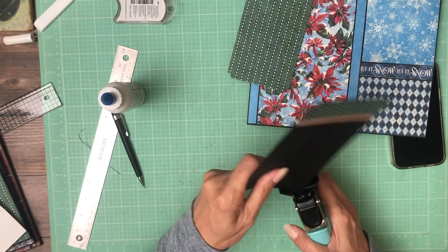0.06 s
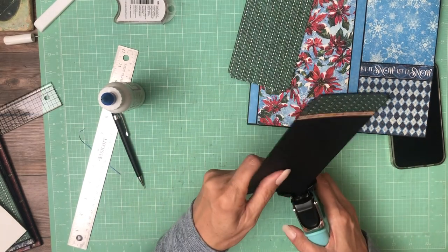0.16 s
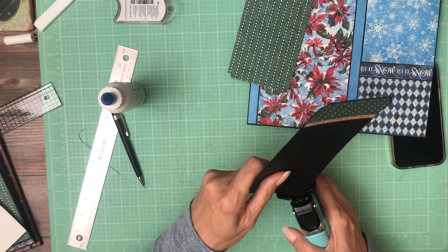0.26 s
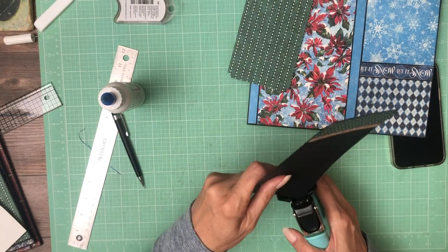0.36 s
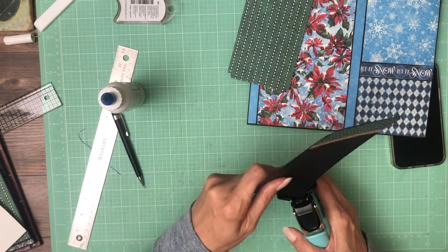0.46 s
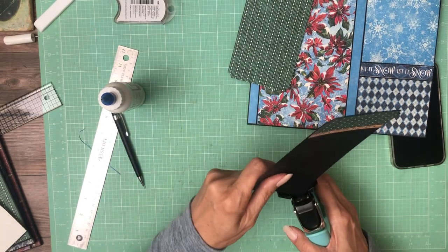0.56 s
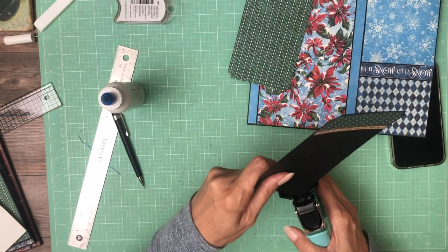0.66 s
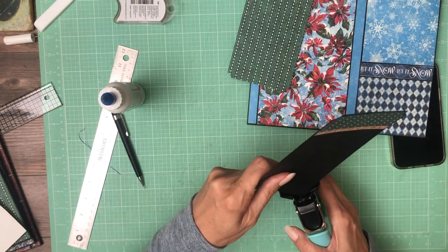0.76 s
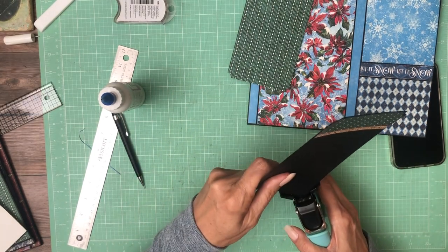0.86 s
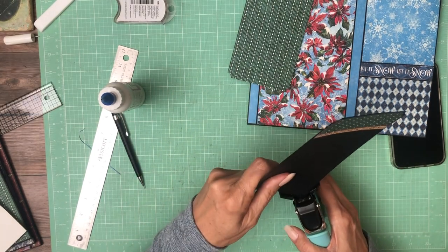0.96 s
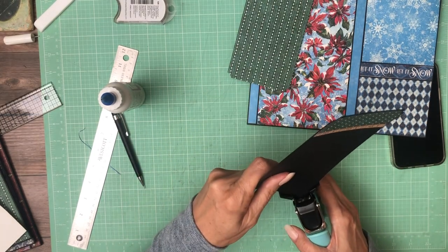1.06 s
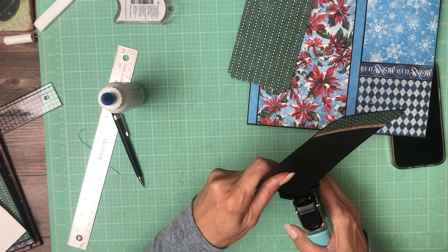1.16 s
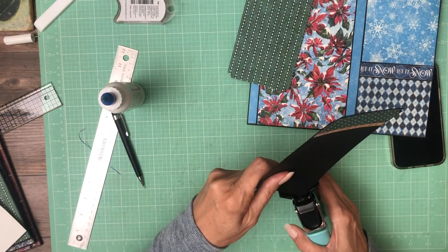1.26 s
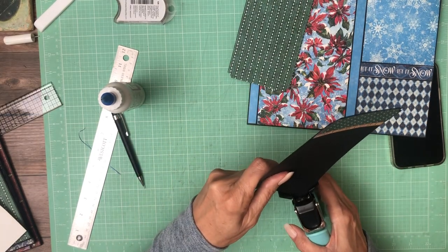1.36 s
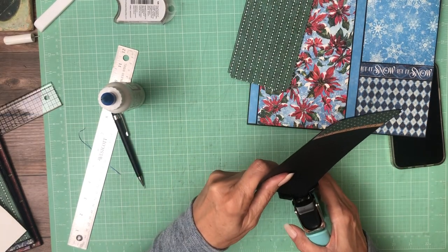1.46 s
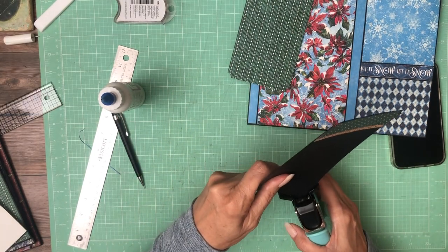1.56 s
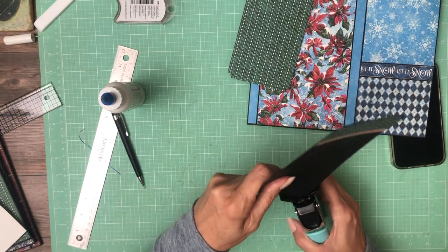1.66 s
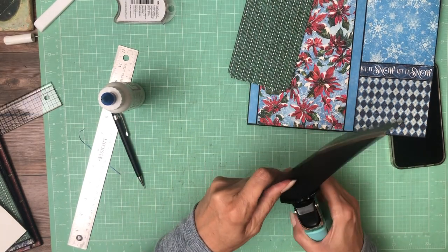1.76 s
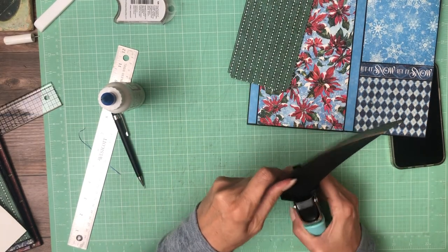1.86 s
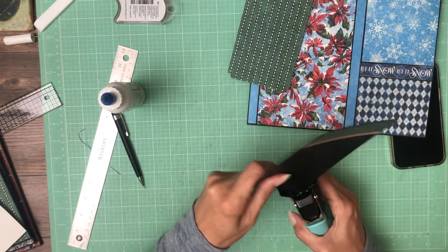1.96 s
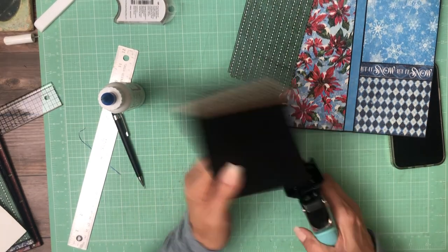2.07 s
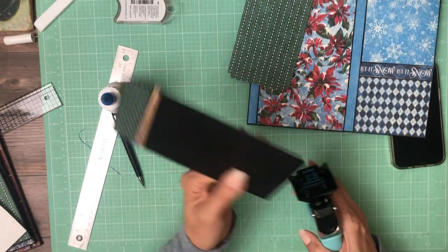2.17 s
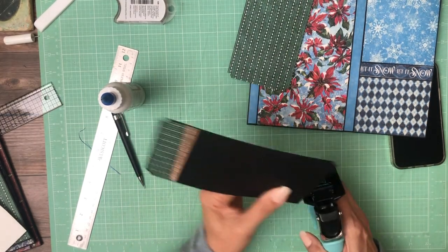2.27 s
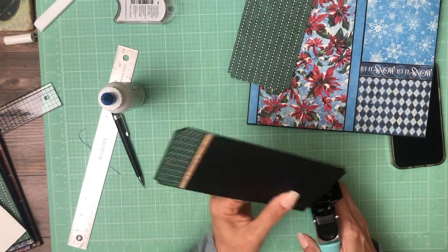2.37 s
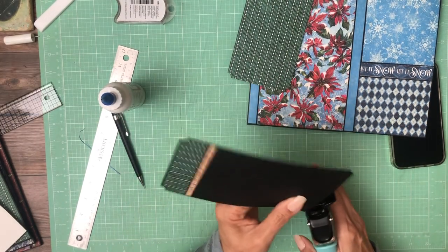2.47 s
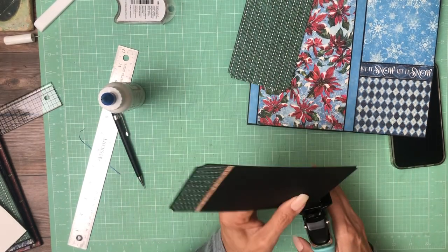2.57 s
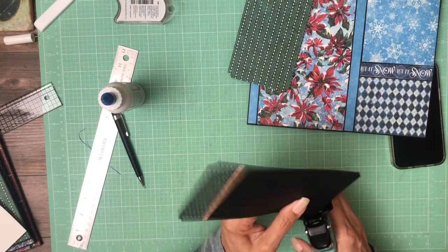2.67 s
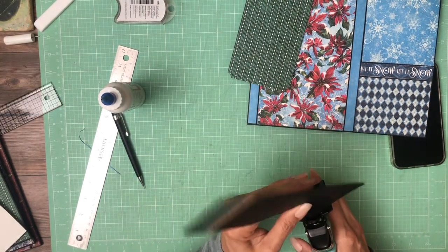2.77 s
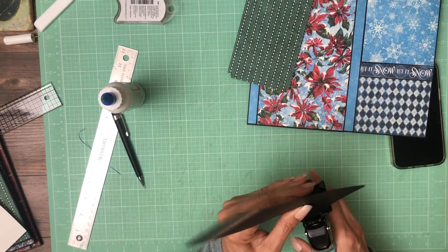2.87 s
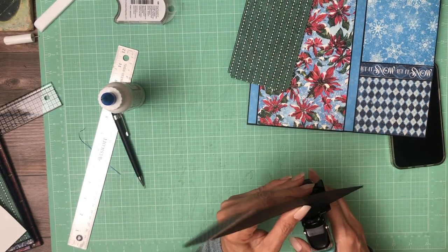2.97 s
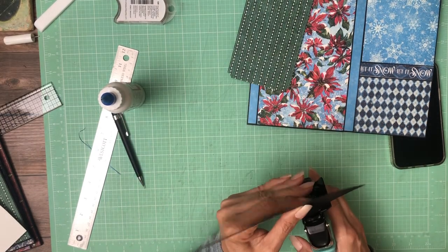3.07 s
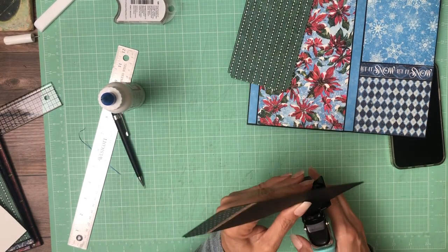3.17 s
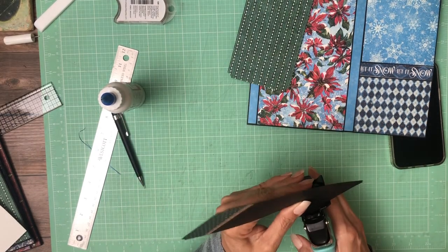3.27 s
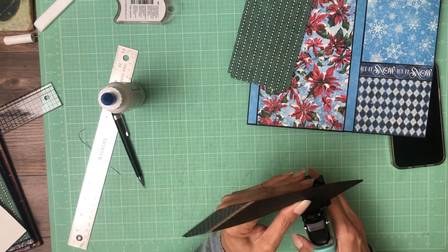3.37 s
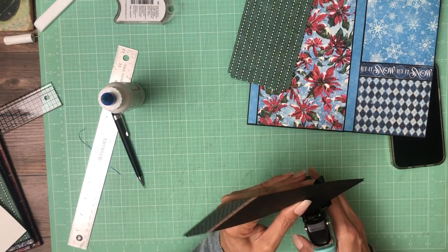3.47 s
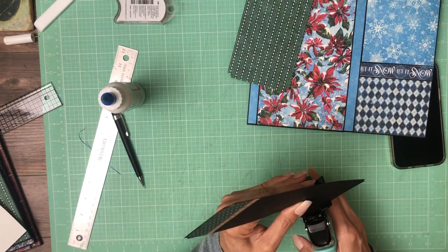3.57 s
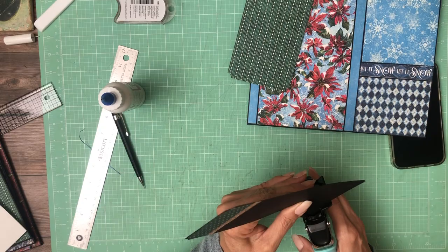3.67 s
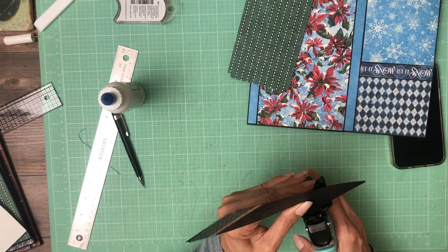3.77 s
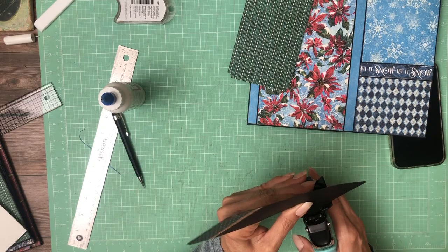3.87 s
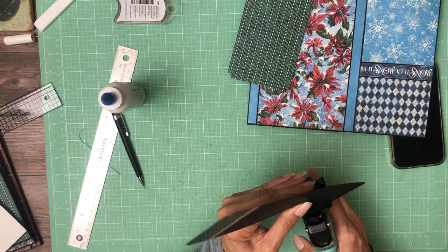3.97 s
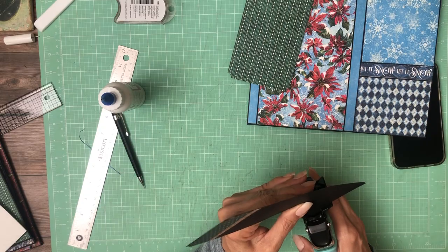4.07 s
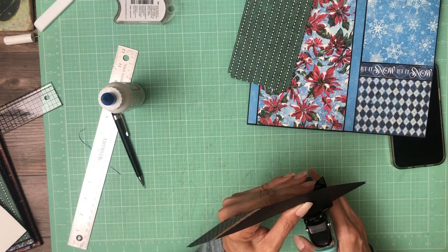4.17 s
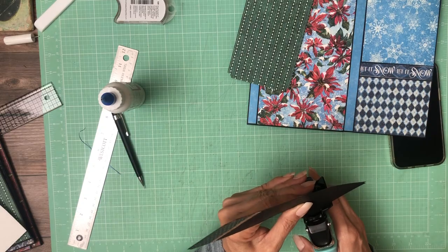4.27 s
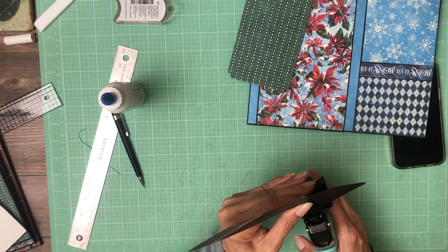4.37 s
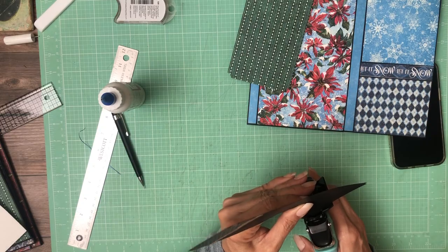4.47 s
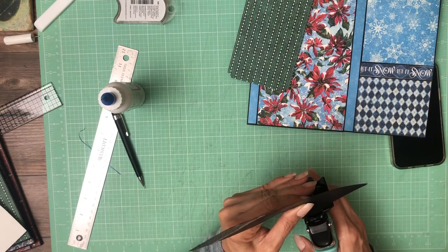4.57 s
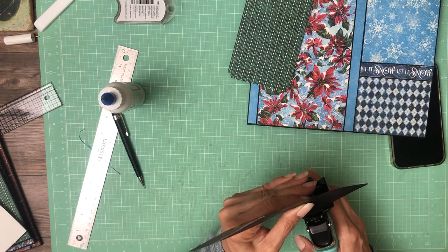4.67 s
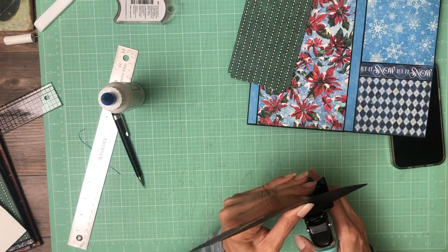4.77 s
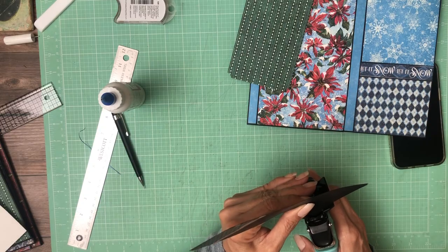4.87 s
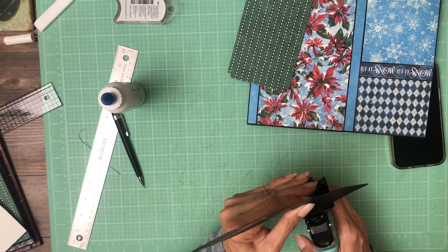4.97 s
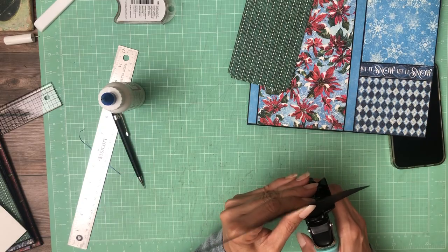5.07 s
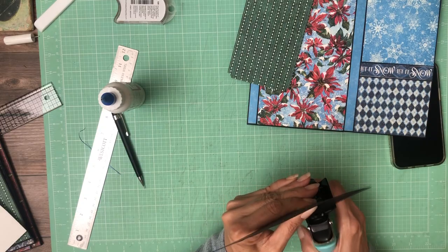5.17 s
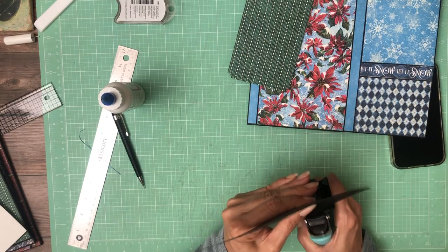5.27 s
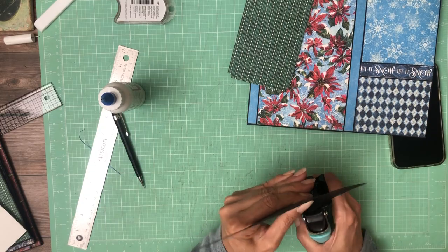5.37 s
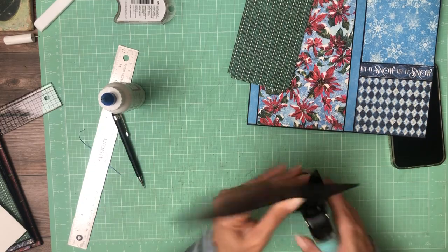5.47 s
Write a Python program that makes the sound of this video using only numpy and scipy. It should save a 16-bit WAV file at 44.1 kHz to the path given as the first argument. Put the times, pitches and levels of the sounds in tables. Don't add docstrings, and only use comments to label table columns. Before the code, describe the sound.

A small, quiet room heard through a close phone microphone, mono and dry with a short dull tail. From 0 to 0.7 s stiff card scrapes softly into a steel punch jaw, with small ticks and nudges. Near silence follows until 1.7 s, when the jaw closes with a gritty rub, nips at 1.77 and shears through at about 1.83 with a bright, fibrous crunch. From 1.96 to 2.09 the lever opens in a rattling run of metallic clacks with low thuds. The sheet then swishes and flaps at 2.1-2.3, knocks hollowly at 2.4, and ticks brightly at 2.66-2.76. Very faint brushes and ticks continue, with a small finger slide at 3.23 and a tick at 3.46. After about 4 s there is mostly room tone and a faint low motor hum. At 5.15 the jaw closes again, crunches at 5.24-5.3, and releases with the loudest hard snaps at 5.44-5.47 and a low thud.

```python
import sys
import numpy as np
from scipy import signal
from scipy.fft import rfft, irfft
from scipy.io import wavfile
from scipy.ndimage import uniform_filter1d

SR = 44100
rng = np.random.default_rng(int(sys.argv[2]) if len(sys.argv) > 2 else 0)


def unload_audio(sound):
    columns = np.transpose(np.atleast_2d(sound))
    steps = np.round(np.clip(columns, -1, 1) * 32767)
    wavfile.write(sys.argv[1], SR, steps.astype(np.int16))


def gain_from_decibels(decibels):
    exponent = np.asarray(decibels, float) / 20
    return 10 ** exponent


N = 243431


def unit(x):
    return x / np.sqrt(np.mean(x ** 2) + 1e-30)


def even(x, weight):
    return x * np.sqrt(np.sum(weight ** 2) / np.sum((x * weight) ** 2))


def peak(x, db):
    return x * gain_from_decibels(db) / np.max(np.abs(x))


def add(out, x, start_s):
    i = int(start_s * SR)
    out[i:i + len(x)] += x[:max(len(out) - i, 0)]


def band(x, lo_hz, hi_hz, order=3):
    return signal.sosfilt(signal.butter(order, [lo_hz, hi_hz], "band", fs=SR, output="sos"), x)


def walk(count, rate_hz):
    hold = max(int(SR / rate_hz), 2)
    levels = np.repeat(rng.standard_normal(count // hold + 1), hold)
    return unit(uniform_filter1d(levels, hold)[:count])


def struck(t, modes, t60_s, rise_s):
    push = (1 - np.exp(-t / rise_s)) ** 2
    decay = np.exp(-np.log(1000) * t / max(t60_s, .005))
    return push * decay * sum(gain_from_decibels(db) * np.cos(2 * np.pi * hz * t) for hz, db in modes)


def pressure(t, rise_s, fall_s, steep, roundness):
    build = np.clip(t / rise_s, 0, 1) ** steep
    return build * gain_from_decibels(-20 * (np.maximum(t - rise_s, 0) / fall_s) ** roundness)


def ring(x, modes, sway_db):
    out = 0
    for k, (hz, width_hz, db) in enumerate(modes):
        shifted_hz = hz * (1 + 0.021 * rng.standard_normal())
        gain = (-1) ** k * gain_from_decibels(db + sway_db * walk(len(x), 45))
        b, a = signal.iirpeak(shifted_hz, shifted_hz / width_hz, fs=SR)
        out = out + gain * signal.lfilter(b, a, x)
    return out


def rub(count, body, lo_hz, hi_hz):
    steel = {"jaw": [(260, 82, 6.5), (508, 67, 14), (1730, 160, 11), (2800, 50, 7), (3660, 760, 18),
             (4820, 550, 12), (5180, 350, 10.5), (6060, 200, 11), (7440, 190, -9), (9200, 250, 11)],
             "blade": [(350, 46, 5), (514, 100, 12), (1049, 52, 7), (1303, 130, 10.5), (1605, 220, 10.5),
             (2020, 340, 10.5), (2680, 480, 17), (3060, 1100, 11), (5336, 19000, -9.5), (6220, 390, 6),
             (9300, 500, 3), (12700, 900, 4.5)], "bite": [(260, 80, 5.5), (516, 290, 9.5), (1580, 220.3, 9),
             (2620, 470, 18), (3220, 500, 7), (4292, 900, 9.5), (5600, 250, 2.5), (9150, 400, 6),
             (12000, 700, 6), (14630, 610, 7)], "guide": [(450, 85, -1), (1710, 130, -5), (2330, 68, 9),
             (3400, 920, 20), (4000, 190, 9), (5100, 160, 11), (6200, 210, 9)], "edge": [(1260, 80, 9),
             (1400, 140, 6), (1917, 250, 6.5), (2620, 300, 18.5), (4000, 1700, 5.5), (6200, 560, 0)]}
    card = {"flap": [(319, 210, 32), (1560, 120, 13), (2264, 590, 10), (3205, 380, 12), (4800, 980, 8),
            (8170, 1200, 13), (10600, 400, 14), (14300, 1200, 5)], "sheet": [(420, 140, 37),
            (1650, 230, 5.5), (3940, 780, 3.5), (5130, 120, 13), (5850, 400, -1.5), (7000, 610, 9),
            (8550, 2000, 5.5), (11900, 500, 2), (14500, 780, -0.5)], "rim": [(430, 160, 2), (1630, 76, 3),
            (3150, 120, 3.5), (3900, 240, 6), (5180, 170, 21.5), (7150, 120, 11), (8400, 270, -4),
            (12000, 300, 2), (14800, 910, 7)], "finger": [(282, 96, 7.5), (1590, 350, 20.5),
            (2600, 1300, 22), (4000, 300, 9), (5100, 230, 12), (6730, 310, 15), (8160, 500, 24),
            (9100, 600, 25)]}
    grain = {"bite": (320, 2.7, .2, 2, 20000), "rim": (205, 6.2, 0.21, 8.1, 20000),
             "jaw": (203, 2.3, 0.24, 3.8, 20000), "blade": (330, 1.4, 0.13, 2.9, 23000),
             "edge": (590, 1.6, 0.091, 3.7, 20000), "guide": (340, 2.2, 0.21, 2.2, 20000),
             "sheet": (160, 0.73, 0.068, 4.7, 20000), "flap": (270, 2.9, 0.08, 5.4, 20000),
             "finger": (670, 1.5, 0.21, 1.2, 6800)}
    rate_hz, scatter_db, crack_share, sway_db, top_hz = grain[body]
    noise = rng.standard_normal(count)
    crack_db = 10 * np.minimum(rng.exponential(size=count), 2.8)
    cracks = unit((rng.random(count) < .03) * np.sign(noise) * gain_from_decibels(crack_db))
    force = noise
    if lo_hz > 500:
        force = force + crack_share * 2 * cracks
    if lo_hz < 500:
        scatter_db = scatter_db * .4
    force = force * gain_from_decibels(scatter_db * walk(count, rate_hz))
    direct = band(force, 100, top_hz, order=2) if top_hz < hi_hz else force
    modes = [mode for mode in {**steel, **card}[body] if lo_hz <= mode[0] < hi_hz]
    return band(direct + ring(force, modes, sway_db), lo_hz, hi_hz)


def rub_strokes(out, rows, body, boom_db, hiss_db, steep, roundness, hiss_pace):
    # low f/Hz, high f/Hz
    bands_hz = [(900, 3200), (190, 800), (3200, 7000), (7000, 16500)]
    stroke_s, boom_lag_s = .21, 0.017
    t = np.arange(int(stroke_s * SR)) / SR
    fade = np.clip((stroke_s - t) / .03, 0, 1)
    for start_s, rise_s, db, fall_s, ring_db in rows:
        def shape(lag_s, pace):
            return pressure(t - lag_s, max(rise_s, .001), max(fall_s, .005) / pace, steep, roundness)

        grains = []
        for lo_hz, hi_hz in bands_hz:
            weight = shape(boom_lag_s * (lo_hz < 500), 1)
            grains.append(even(rub(len(t), body, lo_hz, hi_hz), weight))
        mid, boom, scrape, hiss = grains
        top = band(hiss, 13000, 19000, order=1)
        sound = (mid * gain_from_decibels(ring_db) + scrape) * shape(0, 0.94)
        sound += boom * gain_from_decibels(boom_db) * shape(boom_lag_s, 1)
        sound += gain_from_decibels(hiss_db) * ((hiss - top) * shape(0, hiss_pace) + top * shape(0, hiss_pace * 1.3))
        add(out, sound * gain_from_decibels(db) * fade, start_s)


def shear():
    # start t/s, rise/s, scrape level/dB, 20 dB fall/s, body ring relative level/dB
    closings = [(1.7, 0.009, -60, 0.056, 3), (1.726, 0.015, -44, 0.21, 2.5),
                (1.74, 0.025, -42.5, 0.042, 7.5), (5.145, 0.021, -70.5, 0.059, 5.5),
                (5.178, 0.024, -48, 0.03, -8.5), (5.203, 0.0046, -40, 0.08, -1),
                (5.215, 0.015, -38, 0.041, 6), (5.418, 0.0049, -42, 0.018, 13)]
    nips = [(1.772, 0.0043, -33, 0.07, -3), (1.78, 0.0052, -35, 0.1, 6), (5.236, 0.003, -28.5, 0.06, -2),
            (5.244, 0.0027, -37.5, 0, 4.5), (2.72, 0.0075, -42, -0.13, 0), (2.758, .005, -50, -0.07, -9),
            (2.2, .006, -45, 0.23, -6)]
    cuts = [
        (1.82, 0.012, -25.5, 0.056, 0.89),
        (1.83, 0.02303, -23.5, 0.091, 2.7),
        (5.269, 0.0014, -30.5, 0.012, 2),
        (5.274, 0.0066, -23, 0.073, 1.9),
        (5.285, 0.021, -25, 0.069, 3.8),
    ]
    drags = [
        (1.9, 0.018, -39.5, 0.07, 4.01),
        (5.335, 0.015, -35.5, 0.15, 3.7),
    ]
    openings = [(1.958, 0.0053, -42.5, 0.017, 8), (1.972, 0.0023, -35, 0.041, 0.5),
                (2.007, 0.0034, -29, 0.0094, -5), (2.016, 0.0034, -34.5, .012, 7.5),
                (2.027, 0.0026, -31.5, 0.032, -0.5), (2.035, 0.017, -38.5, .12, 0),
                (2.06, 0.013, -39.5, 0.055, 2), (5.44, 0.0017, -49.5, 0.073, 4),
                (5.4685, 0.0016, -23, 0.008, 3), (5.478, 0.0074, -33.5, 0.084, 6)]
    out = np.zeros(N)
    rub_strokes(out, closings, "bite", -22, -9.5, steep=1.594, roundness=0.9, hiss_pace=0.81)
    rub_strokes(out, nips, "bite", -22, -2.5, steep=0.47, roundness=0.88, hiss_pace=1.1)
    rub_strokes(out, cuts, "blade", -11.5, -1.55, steep=0.6, roundness=1.06, hiss_pace=1.4)
    rub_strokes(out, drags, "edge", -19, -2.5, steep=0.93, roundness=0.98, hiss_pace=2.2)
    rub_strokes(out, openings, "blade", -6, -2, steep=0.83, roundness=1.39, hiss_pace=1.2)
    return out


def snaps():
    # t/s, peak level/dB, ring f/Hz, second ring relative level/dB, t60/s
    snap_rows = [(1.7747, -23.5, 2600, -26, 0.042), (1.963, -14.5, 2600, -6.5, 0.02),
                 (1.9773, -28.5, 1956, -4, 0.06), (2.0089, -18, 2720, -12, 0.0074),
                 (2.0183, -23, 2800, 4, 0.024), (2.0308, -18, 2590, -15, 0.021),
                 (2.064, -22, 2600, -26, 0.038), (2.0872, -20.5, 2694, -14, 0.026),
                 (5.2408, -11.5, 2640, -7, 0.021), (5.271, -13, 2680, -20, 0.014),
                 (5.2765, -7.5, 2515, -17, 0.022), (1.8262, -12, 2690, -20, 0.018),
                 (2.0536, -20.5, 2680, -21, 0.026), (5.4356, -3.5, 2600, -2, 0.014),
                 (5.4642, -6, 2360, -5, 0.025), (5.4689, -6, 2640, 11.5, 0.0065)]
    second_hz, rise_s = 1512, 0.0013
    out, t = np.zeros(N), np.arange(int(.08 * SR)) / SR
    for start_s, db, hz, low_db, t60_s in snap_rows:
        modes = [(hz, 0), (1.09 * hz, -9), (second_hz, low_db), (1.2 * second_hz, low_db - 6.5)]
        steel = band(struck(t, modes, t60_s, 0.95 * rise_s), 1150, 9000, order=2)
        crack = band(rng.standard_normal(len(t)), 1600, 7500, order=2)
        crack *= struck(t, [(0.0035, 0)], 0.62 * t60_s, .7 * rise_s)
        add(out, gain_from_decibels(db + 1.5) * steel + peak(crack, -11.5 + .55 * db), start_s - .0003)
    return out


def feed():
    # start t/s, rise/s, scrape level/dB, 20 dB fall/s, body ring relative level/dB
    feeds = [(0, 0.002, -64, 0.02, 1.5), (.579, 0.006, -67, 0.045, 1.5), (.342, 0.003, -57, 0.04, 2.5),
             (.041, 0.062, -51, 0.045, -2), (.101, 0.032, -47.5, 0.06, -6), (.216, .004, -51.5, .035, -4.5),
             (.2575, 0.003, -51, .02, -1.5), (.2745, 0.0035, -50.5, .022, 2.5), (.283, 0.015, -47, .055, 4)]
    nudges = [
        (.432, 0.0017, -53, 0.057, -5),
        (.684, 0.012, -59, 0.026, 2.5),
    ]
    out = np.zeros(N)
    rub_strokes(out, feeds, "jaw", -2, -19, steep=0.99, roundness=1.28, hiss_pace=0.92)
    rub_strokes(out, nudges, "guide", -2.5, -18, steep=0.59, roundness=0.86, hiss_pace=1.2)
    return out


def card_ticks():
    # t/s, peak level/dB, lower f/Hz, upper f/Hz, upper relative level/dB
    feed_ticks = [(0.1315, -32, 1800, 3750, -30), (0.2196, -47, 3400, 6100, -1),
                  (0.2603, -38, 1900, 3600, 3), (0.2761, -28, 1745, 3400, -4.5),
                  (0.294, -30, 1860, 3600, -23), (0.345, -31, 1800, 3660, -9), (0.123, -40, 5200, 3780, 4),
                  (0.148, -38, 3150, 5850, -10), (0.4354, -40.5, 2300, 3560, 1),
                  (.4325, -44, 5020, 6310, -0.5), (0.5837, -58, 1720, 4000, 7), (.59, -64, 3900, 5250, 3),
                  (0.694, -54, 1640, 5100, 10), (1.703, -50, 1770, 4000, 1), (1.7288, -36.5, 2600, 4290, 5)]
    turn_ticks = [(2.419, -36.5, 1670, 5060, -35), (2.4744, -58, 1650, 5390, 8.5),
                  (2.56, -50, 1630, 5060, 10), (2.664, -18, 2154, 3370, -7.5),
                  (2.6672, -22, 1650, 5500, -5), (2.7238, -20.5, 1700, 3410, -1.5),
                  (2.7612, -31, 1745, 3810, 5), (2.903, -64, 1610, 3900, -1.5),
                  (3.0701, -61.5, 2420, 3560, 0.5), (2.927, -53, 2620, 4820, -6),
                  (2.9696, -44, 1626, 3650, -24), (3.177, -51, 1550, 5200, 0),
                  (3.45, -53, 1740, 4800, -1.5), (3.4555, -36, 3130, 4930, -5.5),
                  (3.456, -41.5, 4140, 7300, -18), (3.21, -60, 5100, 3400, -9),
                  (3.668, -55, 1680, 4960, 3.5), (3.667, -54, 4040, 2800, -6), (3.96, -61, 5000, 3300, 0),
                  (5.1008, -56, 1621, 3576, -12.5)]
    # f/Hz, relative level/dB
    steel_modes = [(1650, -13), (2750, -14), (3700, -8), (5050, -9), (6200, -14), (7400, -23)]
    rise_s, spread = 0.0018, 0.027
    out, t = np.zeros(N), np.arange(int(.08 * SR)) / SR
    for rows, t60_s, rattle_db in [(feed_ticks, 0.021, -14), (turn_ticks, 0.016, -6.5)]:
        for start_s, db, low_hz, high_hz, high_db in rows:
            modes = [(low_hz, 0), (high_hz, high_db)]
            for hz, mode_db in steel_modes:
                spot_hz = hz * (1 + spread * rng.standard_normal())
                modes.append((spot_hz, mode_db + high_db * (hz > 3200) + 1.6 * rng.standard_normal()))
            chatter = gain_from_decibels(2.2 * walk(len(t), 900))
            steel = gain_from_decibels(db + 6.5) * chatter * struck(t, modes, t60_s, rise_s)
            rattle = band(rng.standard_normal(len(t)), 1600, 6530)
            rattle *= struck(t, [(0.0036, 0)], 0.5 * t60_s, rise_s)
            add(out, steel + peak(rattle, db + max(high_db, -6) + rattle_db), start_s - .0013)
    return out


def handle_sheet():
    # start t/s, rise/s, scrape level/dB, 20 dB fall/s, body ring relative level/dB
    slides = [
        (2.143, 0.018, -41.5, 0.135, -20),
    ]
    brushes = [(2.136, .011, -43.5, .055, -7), (2.235, 0.035, -47, 0.02, -12),
               (2.597, 0.025, -55, 0.06, -13), (2.647, 0.01, -42.5, 0.075, -13),
               (2.28, .01, -54, 0.075, -10)]
    flaps = [(2.12, 0.0052, -43, 0.12, 7), (2.42, 0.0053, -65, 0.38, 0), (2.66, 0.0039, -46, 0.027, 10),
             (2.672, 0.026, -43, 0.052, 6), (2.7, 0.015, -50, 0.016, -7), (2.728, 0.0048, -55, 0.03, 13),
             (2.43, 0.027, -75, 0.059, -2.5), (2.83, 0.034, -72, 0.093, -1), (2.9, 0.0053, -66.5, 0.08, 3),
             (2.95, 0.014, -64.5, 0.12, 4.5), (2.765, 0.003, -60, 0.19, -4), (3.06, 0.013, -70, 0.1, 0.5),
             (3.456, 0.0041, -62, 0.027, 3.5), (3.925, 0.033, -71, 0.034, 3)]
    touches = [
        (3.228, 0.0089, -56, 0.045, 3.5),
        (3.237, 0.024, -50.5, 0.033, 9.8),
    ]
    squeaks = [
        (.075, 0.046, -49, 0.06, -6),
        (2.53, 0.021, -59, 0.2, -8),
        (2.58, 0.02, -55, 0.15, -10),
        (3.168, 0.0064, -65.5, 0.15, -6),
    ]
    out = np.zeros(N)
    rub_strokes(out, slides, "sheet", -15, .5, steep=1.3, roundness=4, hiss_pace=1.02)
    rub_strokes(out, brushes, "sheet", -16, -2, steep=0.5, roundness=2.8, hiss_pace=0.98)
    rub_strokes(out, flaps, "flap", -1, -6, steep=1.1, roundness=0.62, hiss_pace=1.3)
    rub_strokes(out, touches, "finger", -4.5, 0.35, steep=1.16, roundness=1, hiss_pace=1.5)
    rub_strokes(out, squeaks, "rim", -3.5, -11, steep=0.88, roundness=1.35, hiss_pace=1)
    return out


def sings():
    # start t/s, length/s, f/Hz, peak level/dB
    lines = [(.279, .055, 1785, -37), (.12, .03, 1805, -41), (1.836, .085, 1052, -27),
             (1.85, .05, 1325, -26), (1.9, .055, 1255, -31), (1.83, .06, 2815, -26),
             (5.286, .08, 1048, -26), (5.27, .075, 1265, -29), (5.28, .06, 2805, -25),
             (2.145, .055, 905, -36), (5.35, .055, 1250, -28), (2.533, .06, 5100, -58),
             (2.58, .07, 5100, -50), (2.52, .05, 7100, -66), (2.61, .05, 7050, -57),
             (2.596, .055, 12200, -58), (2.585, .02, 15300, -58), (2.645, .025, 12000, -53),
             (.684, .025, 5080, -55), (.285, .025, 9400, -61), (.05, .08, 258, -52), (2.26, .08, 5150, -48),
             (5.18, .025, 14800, -63), (5.18, .03, 9000, -63), (.075, .05, 4760, -48),
             (5.152, .04, 2150, -58), (2.61, .04, 4000, -54), (.285, .04, 6400, -56)]
    out, t = np.zeros(N), np.arange(int(.1 * SR)) / SR
    for start_s, length_s, hz, db in lines:
        swell = np.abs(np.sin(np.pi * np.clip(t / length_s, 0, 1) ** 0.85)) ** 2.1
        waver, flicker = walk(len(t), 200), walk(len(t), 60 + hz / 25)
        waver = waver - np.average(waver, weights=swell)
        phase = 2 * np.pi * np.cumsum(hz * (1 + .012 * waver)) / SR
        add(out, gain_from_decibels(db + 4 * flicker) * swell * np.sin(phase), start_s)
    return out


def sheet_knocks():
    # t/s, peak level/dB, ring f/Hz, upper ring relative level/dB, t60/s
    knock_rows = [(1.78, -31.5, 520, -30.5, 0.07), (1.787, -35, 260, -12, 0.21),
                  (.224, -43, 494, -28, 0.094), (1.824, -25, 450, -10, 0.16),
                  (1.853, -23.5, 549, -20, 0.11), (1.885, -28.5, 350, -25, .14),
                  (2.735, -44, 513, -27.5, 0.069), (5.288, -34, 264, -25, 0.055),
                  (1.981, -27, 554, -21.5, 0.02), (2.022, -18.5, 230, -37, 0.051),
                  (2.044, -22.5, 188.5, -30, 0.11), (2.122, -17, 461, -3.5, 0.0324),
                  (2.13, -24.5, 414, 9, 0.076), (2.209, -26.5, 350, -40.5, 0.056),
                  (2.238, -23, 430, -44, 0.03), (2.246, -42, 418, -25, 0.036),
                  (2.355, -30.5, 442, -60, 0.077), (2.367, -33, 407, -53, 0.029),
                  (2.419, -17, 430, -25.5, 0.026), (2.664, -32.5, 282, -49.5, 0.051),
                  (5.211, -46, 540, -19, 0.037), (5.247, -30, 550, -23, 0.025),
                  (5.284, -37, 536, -10, 0.051), (5.473, -16, 221, -15, 0.067), (5.492, -30, 178, -9, 0.1),
                  (2.97, -57.5, 520, 0, .08), (3.457, -55, 520, -2, 0.046)]
    # multiple of ring f, level/dB
    bending_modes = [(.55, -15.5), (.8, -7.5), (1, 5.5), (1.23, -2.5), (1.5, -16)]
    # f/Hz, level/dB
    upper_modes = [(900, 0.5), (1130, 0.5)]
    push_s = 0.0016
    out, t = np.zeros(N), np.arange(int(.4 * SR)) / SR
    for start_s, db, hz, high_db, t60_s in knock_rows:
        low = sum(struck(t, [(hz * m, mode_db)], t60_s / m ** 0.8, push_s) for m, mode_db in bending_modes)
        high = struck(t, upper_modes, 0.39 * t60_s, push_s)
        flutter = band(rng.standard_normal(len(t)), 0.48 * hz, 1.174 * hz, order=2)
        flutter *= struck(t, [(0.0012, 0)], 1.6 * t60_s, 0.016)
        knock = peak(low, db) + peak(high, db + high_db) + peak(flutter, db - 8)
        add(out, band(knock, .5 * hz, 2700, order=2), start_s + .0015)
    return out


def thuds():
    # t/s, peak level/dB, ring f/Hz, t60/s
    thud_rows = [(2.05, -47, 29, 0.18), (5.485, -46, 31, 0.27), (1.2, -60.5, 190, 0.21),
                 (0.051, -66, 110, 0.56), (0.21, -63, 140, 0.77), (2.781, -56.5, 120, 0.19),
                 (1.7, -50.5, 107, 0.69), (2.024, -25.5, 150, 0.14), (2.079, -31, 97.5, 0.13),
                 (2.4, -46, 96, 0.17), (2.311, -50.5, 90, 0.27), (2.478, -58, 108, 0.28),
                 (5.298, -49.5, 100, 0.54), (5.478, -27, 126.8, 0.27)]
    out, t = np.zeros(N), np.arange(int(.4 * SR)) / SR
    for start_s, db, hz, t60_s in thud_rows:
        modes = [(0.61 * hz, -9), (hz, 0), (hz, -5)]
        add(out, peak(struck(t, modes, t60_s, 0.0083), db), start_s - .01)
    return out


def room(x):
    t = np.arange(int(.4 * SR)) / SR
    near_t60_s, far_t60_s, far_db = 0.18, 0.26, -19
    decay = gain_from_decibels(-60 * t / near_t60_s) + gain_from_decibels(far_db - 60 * t / far_t60_s)
    tail = band(rng.standard_normal(len(t)) * decay * (t > .004), 100, 7000, order=2)
    return signal.fftconvolve(x, tail / np.sqrt(np.sum(tail ** 2)))[:N] * gain_from_decibels(-16)


def room_tone():
    # f/Hz, level/dB per Hz
    spectrum = [(15, -63), (25, -34), (80, -18.5), (103, -1), (159, -11.5), (245, -3), (296, -10.5),
                (358, -7.5), (600, -12.5), (854, -14.5), (1680, -24), (8830, -33), (16500, -44)]
    hz, db = np.transpose(spectrum)
    f_hz = np.fft.rfftfreq(N, 1 / SR) + 1
    gain = gain_from_decibels(np.interp(np.log(f_hz), np.log(hz), db, -80, -80))
    tone = irfft(rfft(rng.standard_normal(N)) * gain, N)
    return unit(tone) * gain_from_decibels(-67 + 0.39 * walk(N, 7))


def motor_hum():
    # t/s, level/dB
    hum_level = [(0, -93), (3.3, -84), (3.6, -75.5), (5.52, -71.5)]
    t = np.arange(N) / SR
    level_db = np.interp(t, *np.transpose(hum_level)) + 1.2 * walk(N, 8.5)
    return np.sin(2 * np.pi * 159.4 * t + 0.64 * walk(N, 4.3)) * gain_from_decibels(level_db)


def scene():
    desk = shear() + snaps() + feed() + card_ticks() + handle_sheet() + sings() + sheet_knocks() + thuds()
    return (desk + room(desk) + room_tone() + motor_hum())[None]


def top_cut(x):
    return signal.sosfilt(signal.butter(12, 15900, fs=SR, output="sos"), x)


def record(dry):
    x = signal.sosfilt(signal.butter(1, 40, "high", fs=SR, output="sos"), dry)
    x = signal.sosfilt(signal.ellip(12, .3, 60, 15750, fs=SR, output="sos"), x)
    return top_cut(x)


dry = scene()
out = record(dry)
unload_audio(out)
```